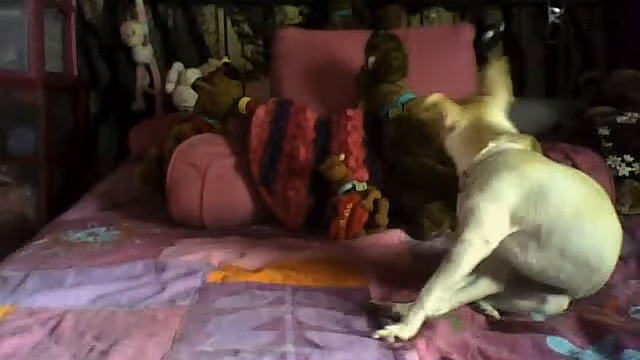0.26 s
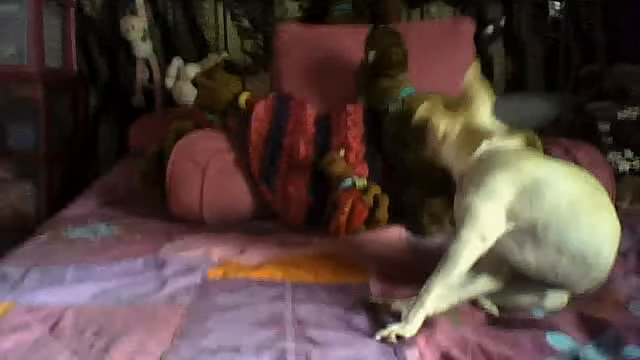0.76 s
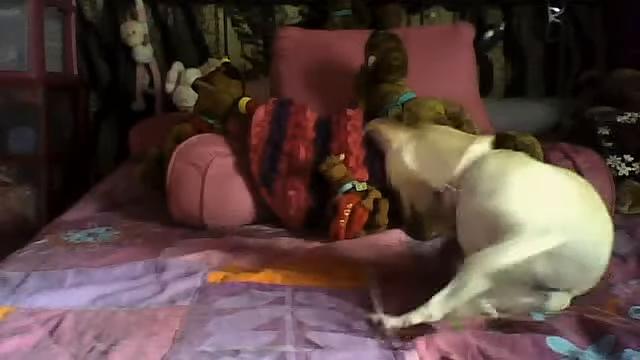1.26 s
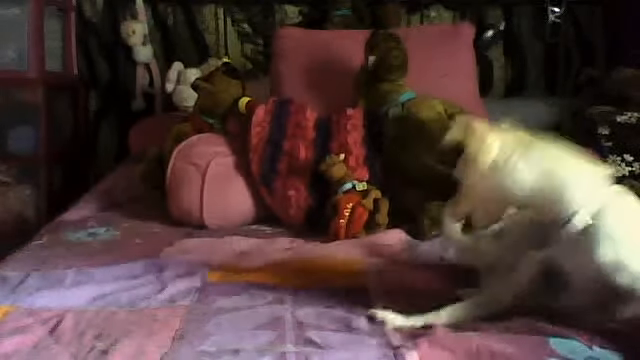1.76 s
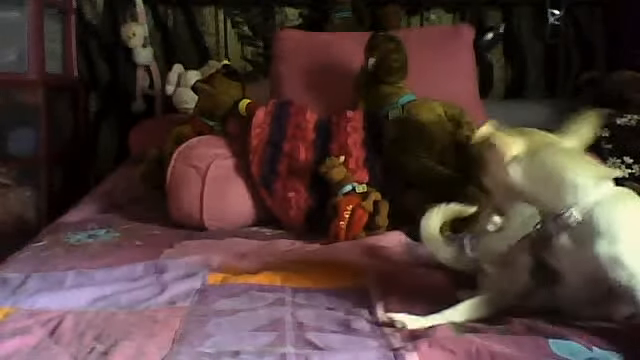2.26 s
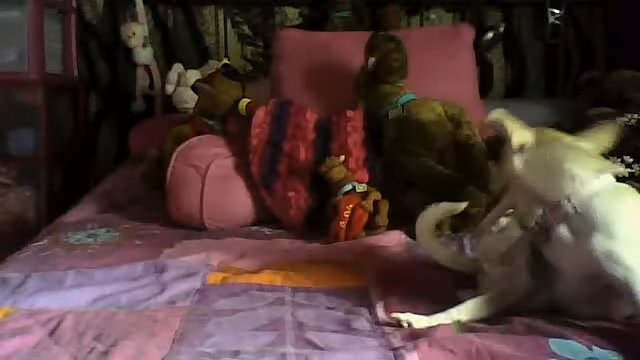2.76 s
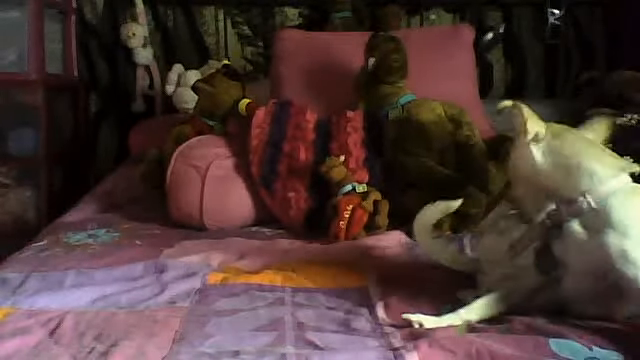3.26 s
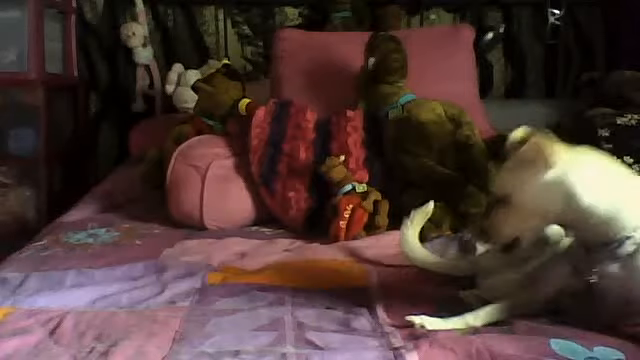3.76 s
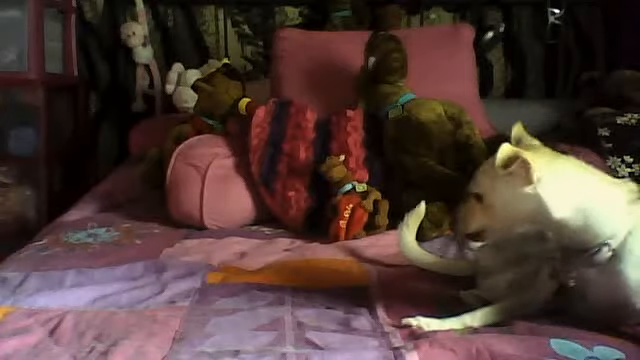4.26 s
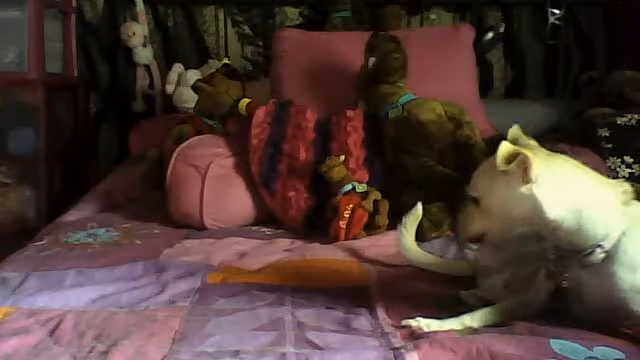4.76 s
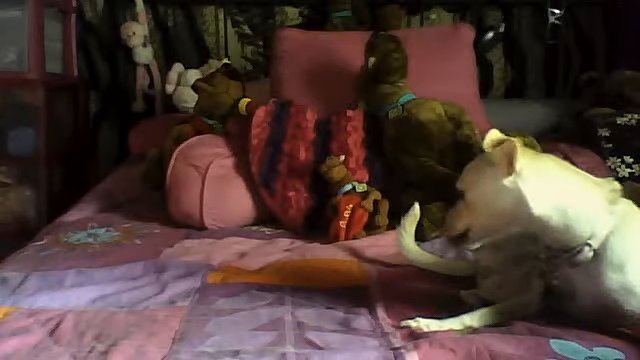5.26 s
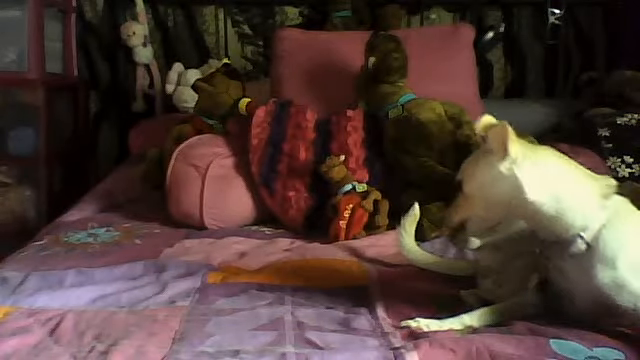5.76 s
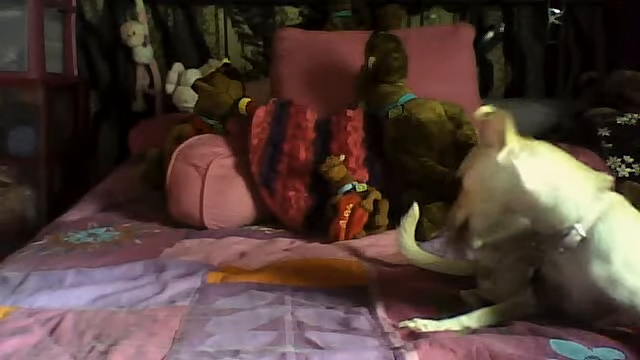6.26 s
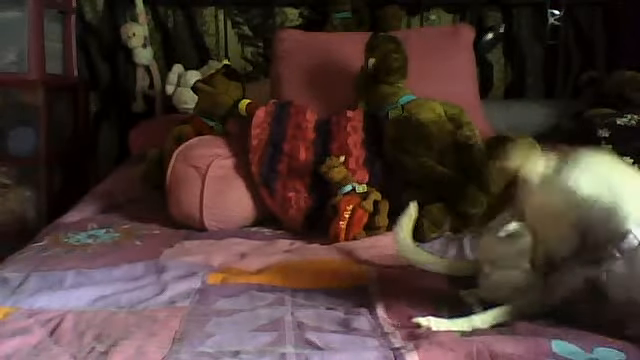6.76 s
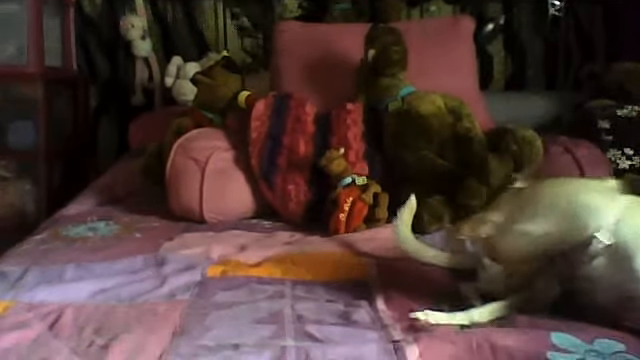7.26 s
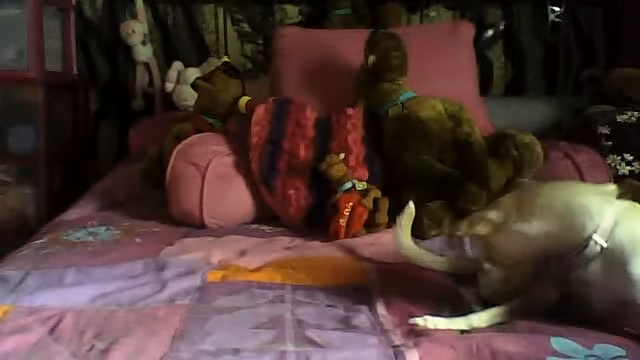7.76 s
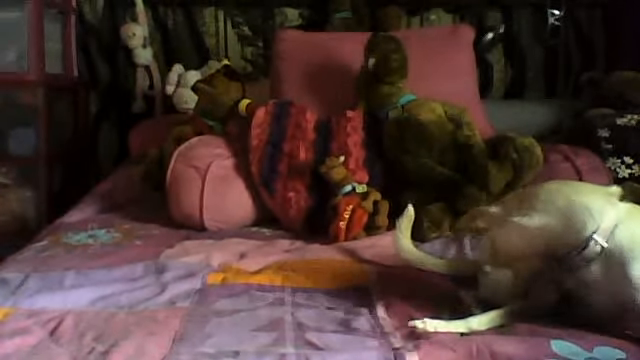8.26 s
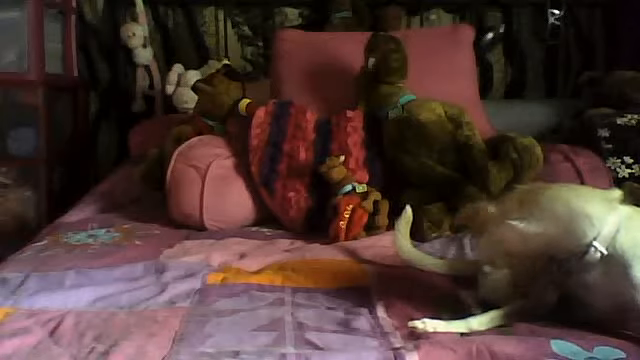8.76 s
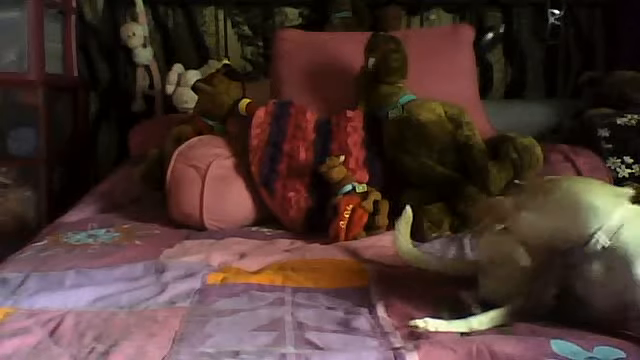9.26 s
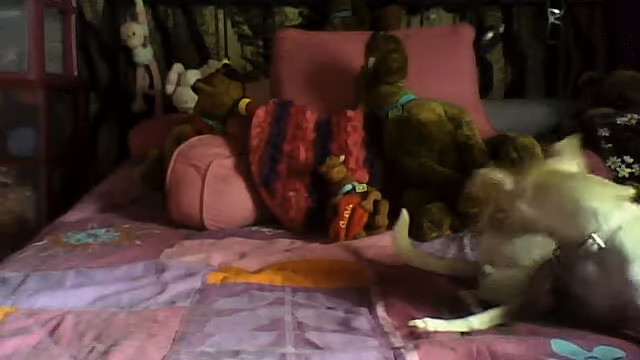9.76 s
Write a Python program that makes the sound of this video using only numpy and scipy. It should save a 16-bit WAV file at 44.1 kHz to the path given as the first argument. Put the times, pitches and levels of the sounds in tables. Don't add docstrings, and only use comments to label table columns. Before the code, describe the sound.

Low laptop hum and whirring fan under constant dry electrical ticks and buzzy crackles, with hard button clicks and a dog shuffling on a bed.

```python
import sys
import numpy as np
from scipy import signal
from scipy.fft import rfft, irfft
from scipy.io import wavfile
from scipy.ndimage import uniform_filter1d

SR = 44100
rng = np.random.default_rng(int(sys.argv[2]) if len(sys.argv) > 2 else 0)


def int16_out(signal):
    q = np.round(np.clip(np.atleast_2d(signal).T, -1, 1) * 32767)
    wavfile.write(sys.argv[1], SR, q.astype(np.int16))


def convert_level_to_amplitude(level_db):
    exponent = np.asarray(level_db, float) / 20
    return 10 ** exponent


N = 441000

# (frequency [Hz], rms level [dB])
DISK_TONES = [(90.2, -37), (106.3, -54.5), (119.8, -73.5), (180.4, -70.5)]
# (frequency [Hz], bandwidth [Hz], rms level [dB])
FAN_WHISTLES = [(895.6, 34, -55), (920, 21, -64.5), (948.4, 39, -53), (1019, 36, -59.5), (1193, 65, -64),
                (1276, 24, -65.5)]
# (time [s], level [dB])
FAN_SWELL = [(0.0, -51), (0.36, -49.5), (0.78, -48.5), (1.2, -49.5), (2.12, -52.5), (2.87, -49.5),
             (3.37, -52), (3.79, -50), (4.15, -53.5), (5.07, -52.5), (5.48, -49), (6.04, -51.5),
             (6.29, -53), (7.52, -49.5), (8.63, -53.5), (9.08, -48), (9.41, -51), (10.0, -49.5)]
FLUTTER_S, FLUTTER_DB = 0.073, 2.0
# (frequency [Hz], density [dB per Hz])
HISS_SPECTRUM = [(30, -0.5), (60, -7.5), (110, -8.5), (150, -17), (280, -24.5), (700, -28.5), (1100, -27),
                 (1750, -31.5), (3100, -33), (7800, -34.5), (10600, -37.5)]
HISS_DB = -38.5

# (time [s], level [dB])
SWAY = [(0.0, -33), (0.67, -15), (0.7, -23), (1.11, -23.5), (1.31, -14.5), (1.5, -39.5), (1.7, -19),
        (1.75, -38), (1.81, -19), (1.95, -28.5), (2.5, -25), (5.99, -28), (6.1, -32), (7.04, -23),
        (7.38, -31.5), (7.96, -23.5), (9.72, -28.5), (10.0, -25.5)]
# (frequency [Hz], density [dB per Hz])
SWAY_SPECTRUM = [(1, -5.5), (4, 2.5), (15, -3), (21, -3), (25, -16), (29, -18), (40, -47), (60, -77)]
# (time [s], push level [dB], quilt drag level [dB])
PAW_STEPS = [(.62, -55, -52), (.77, -49, -51), (.92, -46, -49), (1.18, -45, -47), (1.6, -54, -48),
             (1.77, -44, -45.5), (1.89, -52, -49), (2.03, -43, -43.5), (2.21, -44, -41.5),
             (2.4, -51, -44.5), (2.82, -48, -51), (3.13, -43, -61), (3.42, -51, -55), (3.59, -37.5, -40.5),
             (4.57, -43.5, -48.5), (4.7, -43, -45.5), (4.93, -41.5, -50), (5.08, -53, -47),
             (5.95, -55, -49), (6.25, -43, -60), (6.88, -45, -41), (7.03, -51, -43.5), (7.09, -44, -44),
             (7.25, -39.5, -39), (7.48, -47, -45), (7.57, -43, -47), (7.88, -41, -46), (8.55, -43.5, -45),
             (8.7, -45, -48), (8.81, -44, -49)]
PRESS_DB_PER_S, PUSH_FADE_DB_PER_S, DRAG_FADE_DB_PER_S = 266, 120, 304
REST_PUSH_DB, REST_DRAG_DB = -55, -61

# (time [s], level [dB])
TAG_HITS = [
    (.547, -41),
    (1.263, -40),
    (2.048, -38),
]
# (frequency [Hz], level [dB], 60 dB decay time [s])
TAG_MODES = [(7040, -4, 0.082), (6340, -3, 0.022)]

# (time [s], level [dB])
STRONG_TICKS = [(0.0012, -25.5), (0.2149, -28), (0.521, -26.5), (0.7414, -29), (1.0559, -30), (1.3926, -32),
                (2.1322, -27), (2.891, -27), (3.482, -24.5), (3.7123, -26), (3.783, -29), (4.0318, -30),
                (4.3807, -28), (4.6269, -28), (4.7789, -27), (5.2035, -32), (5.9113, -28), (6.0437, -28),
                (6.3181, -27), (6.8757, -26), (6.9249, -25), (7.4382, -27), (7.65, -27), (7.7088, -27),
                (7.7781, -26.5), (7.8946, -28), (8.0863, -27), (8.2065, -25.5), (8.8788, -28), (9.312, -28)]
PLAIN_TICKS = [.0906, .1857, .3155, .651, 1.149, 1.2419, 1.6783, 1.7978, 1.9049, 2.355, 2.4809, 2.9157,
               3.011, 3.1886, 3.2497, 4.4002, 4.8561, 5.3572, 5.6262, 5.7586, 5.971, 6.0779, 6.1367, 6.7005,
               6.792, 6.8244, 7.0003, 8.6052, 8.918, 9.1508]
PLAIN_DB = -29
FAINT_DB, FAINT_PER_S = -35, 55
POLL_S, POLL_JITTER_S, POLL_SHARE = .031, .006, .2
POLL_DB, POLL_SPREAD_DB = -29.5, 0.5
REPLY_S, REPLY_JITTER_S, REPLY_DB = .055, .0006, -5.5
# (time [s], length [ms], ticks [count])
FLURRIES = [(0.0574, 0.8, 2), (0.3819, 1.2, 3), (1.0363, 0.9, 2), (2.2388, 0.6, 2), (2.9355, 4.8, 8),
            (2.9807, 0.8, 2), (3.2902, 0.8, 2), (4.1128, 0.5, 2), (4.8003, 0.8, 2), (5.2301, 1.3, 2),
            (6.1748, 1.9, 2), (7.2566, 5, 5), (7.5446, 1.4, 2), (7.5592, 0.7, 2), (8.5559, 0.8, 2),
            (9.0083, 1.4, 3), (9.1268, 0.8, 2)]
# (time [s], length [ms],
# pulses [count])
PACKETS = [(0.1554, 6.3, 14), (0.5706, 5.1, 11), (2.403, 5.6, 12), (3.4163, 9.9, 19),
           (3.7361, 5.2, 12), (3.8641, 8.1, 14), (4.3002, 4.5, 11), (4.699, 9.5, 17),
           (5.0864, 5.8, 13), (5.306, 8.6, 16), (5.8508, 8.2, 15), (6.2458, 6.3, 14),
           (6.7641, 4.8, 12), (7.465, 6.3, 13), (7.5715, 5.8, 11), (8.2373, 4.7, 11), (8.3758, 6, 13),
           (8.5437, 5.8, 13), (9.1029, 6.3, 14), (9.6333, 9, 18), (9.7683, 4.9, 12),
           (0.0079, 0.9, 3), (0.0119, 2.8, 6), (0.8299, 3, 5), (0.8407, 7.7, 12), (1.3452, 5.7, 9),
                 (1.3532, 1.9, 5), (2.0309, 4.6, 10), (2.0389, 2, 5), (2.8277, 7.3, 14), (2.8374, 2.1, 4),
                 (6.9073, 8.3, 15), (6.9179, 4.6, 8), (7.0778, 0.9, 3), (7.0856, 1.2, 4), (8.1426, 3.2, 8),
                 (8.148, 3.9, 9), (8.6903, 2.4, 7), (8.6979, 2.6, 5),
           (0.344, 1.9, 6), (0.4516, 2.9, 9), (0.8908, 2.4, 4), (0.9083, 3.4, 8), (0.9678, 2.9, 4),
                 (1.1269, 3.2, 7), (1.6017, 4.3, 8), (1.7516, 1.8, 6), (1.881, 3.1, 7), (2.1481, 3.6, 9),
                 (2.5556, 3.7, 11), (3.1157, 2.9, 8), (3.6168, 2.7, 8), (4.0147, 1.7, 5), (4.5665, 3.4, 9),
                 (4.9312, 2.5, 8), (5.6114, 2.7, 8), (5.7072, 3.6, 10), (5.9845, 3.8, 9), (6.1121, 3.1, 8),
                 (6.5454, 4.1, 10), (7.1693, 1.5, 5), (7.3405, 3, 8), (7.714, 3.6, 8), (7.8628, 3.9, 11),
                 (8.8117, 2.6, 8), (9.3194, 3.2, 9), (9.4791, 2.8, 9), (9.9583, 3.2, 9)]
PULSE_DB = -24.3
SPACING, WIDTH, NARROW = 12.4, 10, 3
PAUSE = 38
# (time [s], depth [dB])
DROPS = [
    (1.1548, -16),
    (2.4569, -14),
    (3.0628, -8.5),
    (4.257, -7.5),
    (5.69, -16),
    (6.8601, -16),
    (7.2523, -9),
    (7.7025, -7.5),
    (9.358, -16.5),
    (9.3636, -20),
]
SKIP_S, SKIP_DB, SKIP_SETTLE_S = .778, -21.5, 0.013

# (time [s], blow level [dB], direction [1 = let go])
BUTTON = [
    (0.2212, -1.5, 0),
    (0.3973, -5, 1),
    (1.2525, -1.5, 0),
    (1.415, -5, 1),
    (6.9641, -1, 0),
    (7.1473, -4.5, 1),
]
# (frequency [Hz], 60 dB decay time [s], rise [ms], peak pressed [dB], peak let go [dB])
CASE_MODES = [(77, 0.28, 31, -38, -32), (123.2, 0.13, 3.8, -21, -15.5), (166.4, 0.089, 3.1, -30, -19),
              (248, 0.069, 7.1, -31, -24), (326.5, 0.07, 4.7, -31, -26), (407, 0.045, 2.4, -29, -22.5),
              (531, 0.019, 10.5, -19.5, -13), (679, 0.039, 3.5, -30, -23.5), (730, 0.027, 4.1, -28, -23.5),
              (920, 0.05, 1.5, -26.5, -24), (1140, 0.01, 0.99, -23, -29), (1263, 0.0096, 1, -18, -16.5),
              (1504, 0.02, 1.1, -27, -29), (1810, 0.0087, 1.4, -20.5, -24), (2100, 0.022, 1.1, -30, -41),
              (2375, 0.011, 0.6, -19, -29), (2750, 0.017, 0.4, -27, -38), (3190, 0.0066, .4, -26, -62),
              (3550, 0.0047, 0.18, -20, -52), (4410, 0.006, 0.21, -32, -37), (5800, 0.0031, .2, -30, -52),
              (7800, 0.0011, 0.073, -23.5, -56)]

# (frequency [Hz], level under the signal [dB])
SMEAR = [(300, -55), (800, -11.5), (2000, -11), (4000, -11.5), (10000, -4.5)]
# (frequency [Hz], gain [dB])
TREBLE_LOSS = [(7000, 1), (9300, -0.5), (9500, -4.5), (10600, -7)]
EDGE_HZ, MIRROR_DB = 10696, -7.5


def evened(x):
    return x / np.sqrt(np.mean(x ** 2) + 1e-20)


def add(mix, s, sound):
    part = mix[round(s * SR):][:len(sound)]
    part += sound[:len(part)]


def coloured(points):
    hz = np.fft.rfftfreq(N, 1 / SR)
    f, db = np.transpose(points)
    gain = convert_level_to_amplitude(np.interp(np.log(hz + .1), np.log(f), db))
    return evened(irfft(rfft(rng.standard_normal(N)) * gain, N))


def whistle(hz, width):
    r = np.exp(-np.pi * width / SR)
    noise = [1, 1j] @ rng.standard_normal((2, N))
    slow = signal.lfilter([1], np.convolve([1, -r], [1, -r]), noise)
    turn = np.exp(2j * np.pi * np.cumsum(hz * np.ones(N)) / SR)
    return evened((slow * turn).real)


def level(rows):
    s, db = np.transpose(rows)
    return convert_level_to_amplitude(np.interp(np.arange(N) / SR, s, db, left=-99, right=-99))


def hiss():
    return convert_level_to_amplitude(HISS_DB) * coloured(HISS_SPECTRUM)


def disk():
    t = np.arange(N) / SR
    return sum(np.sqrt(2) * convert_level_to_amplitude(db) * np.sin(2 * np.pi * (hz * t + rng.random())) for hz, db in DISK_TONES)


def fan():
    whir = sum(convert_level_to_amplitude(db) * whistle(hz, width) for hz, width, db in FAN_WHISTLES)
    smooth = np.hanning(round(FLUTTER_S * SR))
    waver = evened(signal.oaconvolve(coloured(HISS_SPECTRUM), smooth, "same"))
    return evened(level(FAN_SWELL) * convert_level_to_amplitude(FLUTTER_DB * waver)) * whir


def steps(column, fade_db_per_s, rest_db):
    t, db = np.arange(0, N, 64) / SR, rest_db
    for row in PAW_STEPS:
        since = t - row[0]
        fall = np.maximum(-PRESS_DB_PER_S * since, fade_db_per_s * since)
        db = np.maximum(db, row[column] - fall)
    return convert_level_to_amplitude(np.repeat(db, 64)[:N])


def bed():
    push = steps(1, PUSH_FADE_DB_PER_S, REST_PUSH_DB) * whistle(138, 61)
    drag = steps(2, DRAG_FADE_DB_PER_S, REST_DRAG_DB) * whistle(250, 202)
    sway = coloured(SWAY_SPECTRUM)
    sway = evened(sway / np.sqrt(2.1 + uniform_filter1d(sway ** 2, SR // 6)))
    return level(SWAY) * sway + convert_level_to_amplitude(-1.0) * push + convert_level_to_amplitude(-0.5) * drag


def collar():
    out, t = np.zeros(N), np.arange(SR // 10) / SR
    clink = sum(convert_level_to_amplitude(db - 60 * t / t60) * np.sin(2 * np.pi * hz * t) for hz, db, t60 in TAG_MODES)
    for s, db in TAG_HITS:
        add(out, s, convert_level_to_amplitude(db) * clink)
    return out


def packet(length_ms, n, pause, pick, late):
    step = SPACING + 2 * late[-1]
    spare = max(length_ms / 1000 * SR - WIDTH - (n - 1) * step, 0)
    broken = np.argsort(np.argsort(pick[:n - 1])) < max(round(spare / pause), 1)
    share = broken * (.2 + late[1:n] ** 2)
    return np.r_[0, np.cumsum(step + 2 * late[:n - 1] - 1 + spare * share / share.sum())]


def pulse_starts(rows, pause):
    line = np.zeros(N)
    draws = rng.random((len(rows), 3, 30))
    for (s, length_ms, pulses), (pick, late, size) in zip(rows, draws):
        at = np.round(s * SR + packet(length_ms, round(pulses), pause, pick, late)).astype(int)
        line[at] = convert_level_to_amplitude(PULSE_DB + 2 * (size[:len(at)] - 2.0))
    return line


def lone_ticks():
    late, heard, size = rng.random((round(N / SR / POLL_S) - 5, 3)).T
    poll_s = np.cumsum(POLL_S + POLL_JITTER_S * (late - .5))
    polls = np.c_[poll_s, POLL_DB + POLL_SPREAD_DB * size]
    plain = [(s, PLAIN_DB) for s in PLAIN_TICKS]
    s, db = np.r_[STRONG_TICKS, plain, polls[heard < POLL_SHARE]].T
    out = np.zeros(N)
    out[np.round(s * SR).astype(int)] = convert_level_to_amplitude(db + 3.5)
    reply = s + REPLY_S + REPLY_JITTER_S * rng.standard_normal(len(late))[:len(s)]
    out[np.round(reply * SR).astype(int)] = convert_level_to_amplitude(np.minimum(db, PLAIN_DB) + REPLY_DB)
    return out


def dropouts():
    out = np.zeros(N)
    for s, db in DROPS:
        add(out, s - 4 / SR, -convert_level_to_amplitude(db) * np.ones(2))
    t = np.arange(SR // 10) / SR
    add(out, SKIP_S, -convert_level_to_amplitude(SKIP_DB - t * 20 / SKIP_SETTLE_S))
    return out


def traffic():
    wide = pulse_starts(PACKETS, PAUSE)
    stray = (rng.random(N) < FAINT_PER_S / SR) * convert_level_to_amplitude(FAINT_DB + 6.4 * rng.random(N))
    narrow = pulse_starts(FLURRIES, 1) + lone_ticks() + stray
    pulses = np.convolve(wide, np.ones(WIDTH))[:N] + np.convolve(narrow, np.ones(NARROW))[:N]
    edge = np.exp(-np.arange(12) / .7)
    return np.convolve(pulses, edge / edge.sum())[:N] + dropouts()


def button():
    out, t = np.zeros(N), np.arange(SR // 8) / SR
    start = rng.random((2, len(CASE_MODES)))
    for s, blow_db, up in BUTTON:
        up = round(up)
        for (hz, t60, rise_ms, *peak_db), turn in zip(CASE_MODES, start[up]):
            shape = (1 - np.exp(-t * 1000 / rise_ms)) ** 3 * convert_level_to_amplitude(-60 * t / t60)
            ring = shape / shape.max() * np.sin(2 * np.pi * (hz * t + turn))
            add(out, s, convert_level_to_amplitude(blow_db + peak_db[up]) * ring)
    return out


def scene():
    return (hiss() + disk() + fan() + bed() + collar() + traffic() + button())[None]


def spectral_rounding(x):
    hz, _, z = signal.stft(x, SR, nperseg=1024)
    f, db = np.transpose(SMEAR)
    error = rng.standard_normal((*z.shape[::-1], 2)) @ [1, 1j]
    z = z * (1 + convert_level_to_amplitude(np.interp(np.log(hz + 1), np.log(f), db))[:, None] * error.T)
    z = z * convert_level_to_amplitude(np.interp(hz, *np.transpose(TREBLE_LOSS)))[:, None]
    return signal.istft(z, SR, nperseg=1024)[1][:, :N]


def roll_off(x):
    return signal.sosfilt(signal.butter(12, 12010, fs=SR, output="sos"), x)


def record(dry):
    lowpass = signal.firwin(801, EDGE_HZ, window=("kaiser", 9), fs=SR)[None]
    kept = signal.oaconvolve(spectral_rounding(dry), lowpass, "same")
    mirror = kept * (-1.) ** np.arange(N)
    hz = np.fft.rfftfreq(N, 1 / SR)
    fade = convert_level_to_amplitude(MIRROR_DB - 24 * np.maximum(hz - 11400, 0) / 1000)
    return roll_off(kept + irfft(rfft(mirror) * fade, N))


dry = scene()
out = record(dry)
int16_out(out)
```